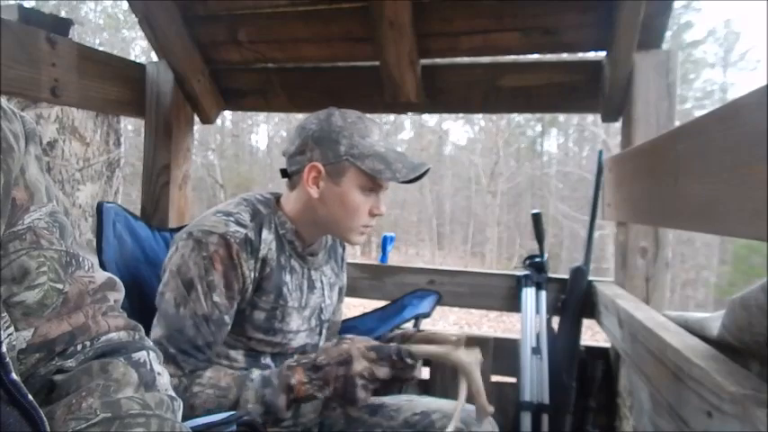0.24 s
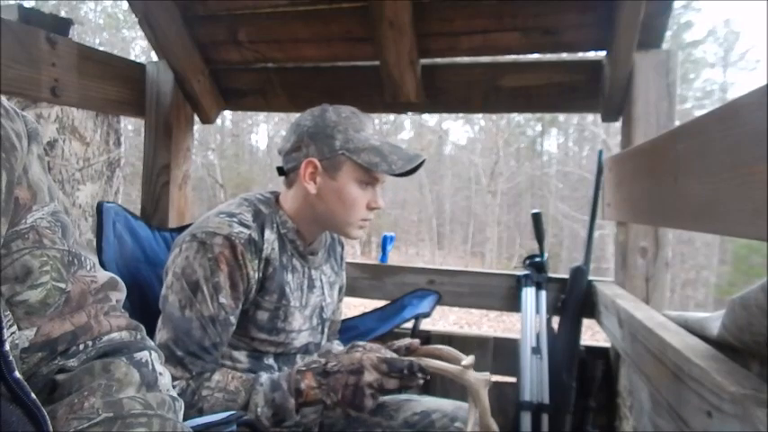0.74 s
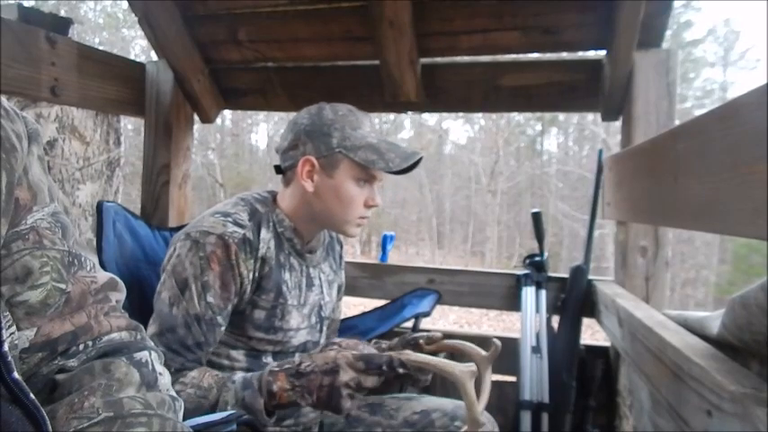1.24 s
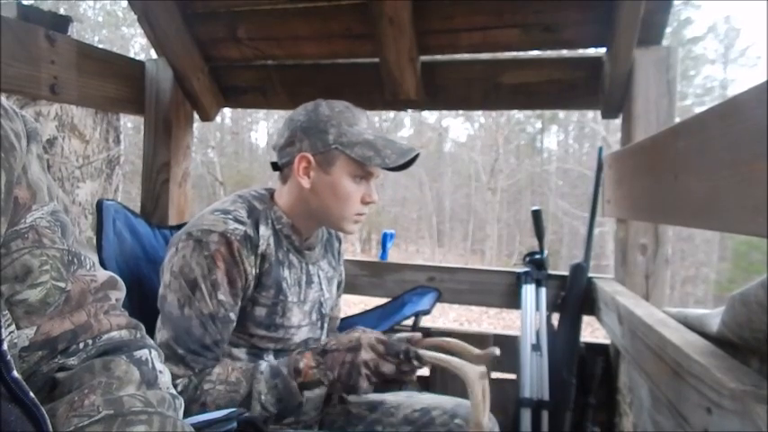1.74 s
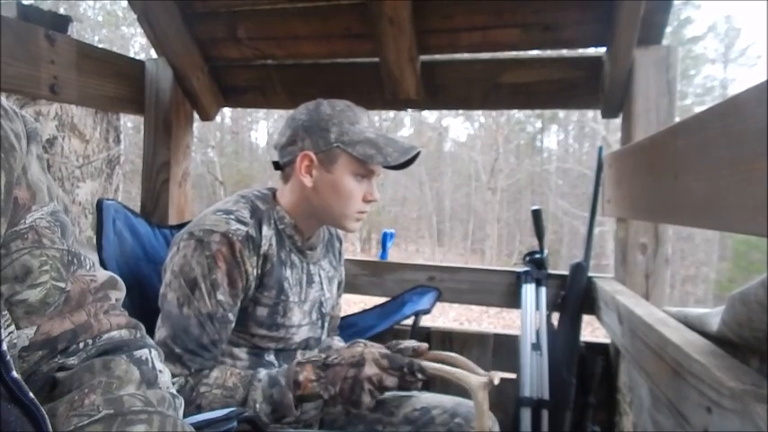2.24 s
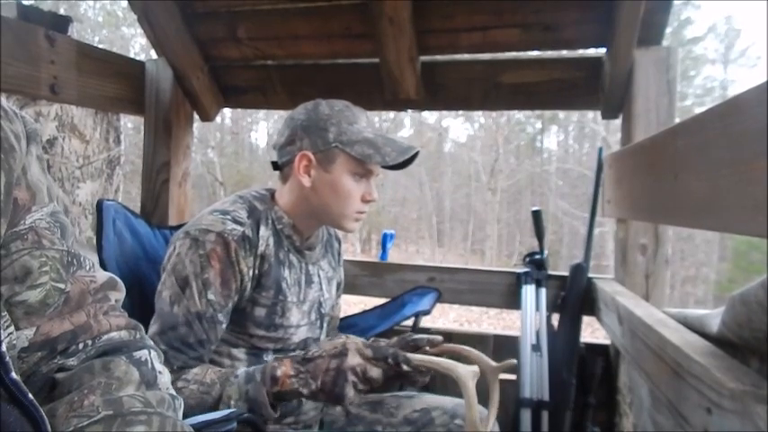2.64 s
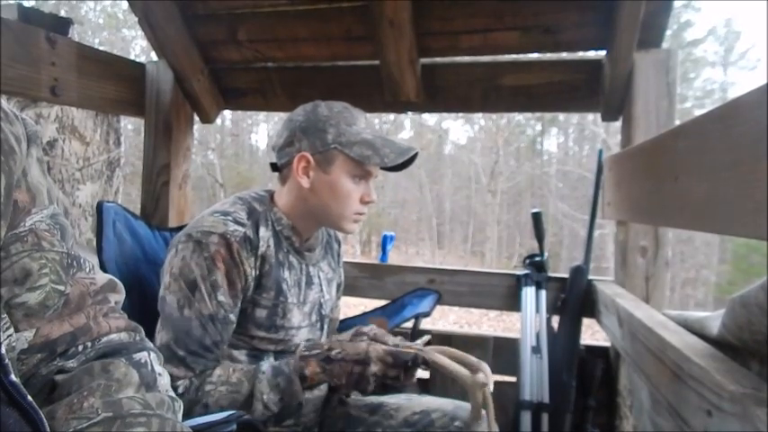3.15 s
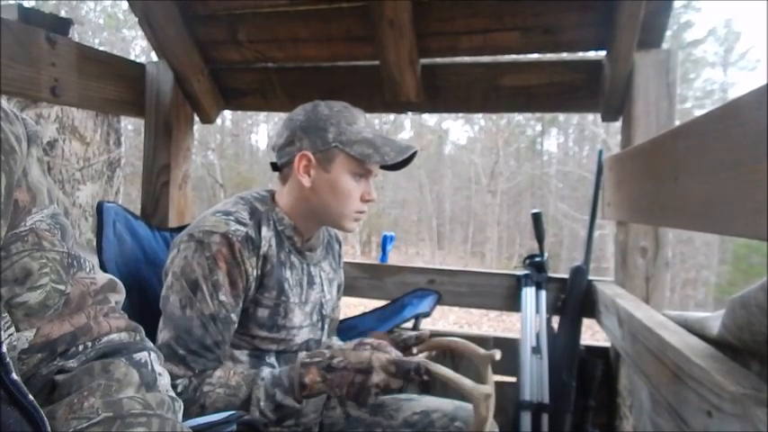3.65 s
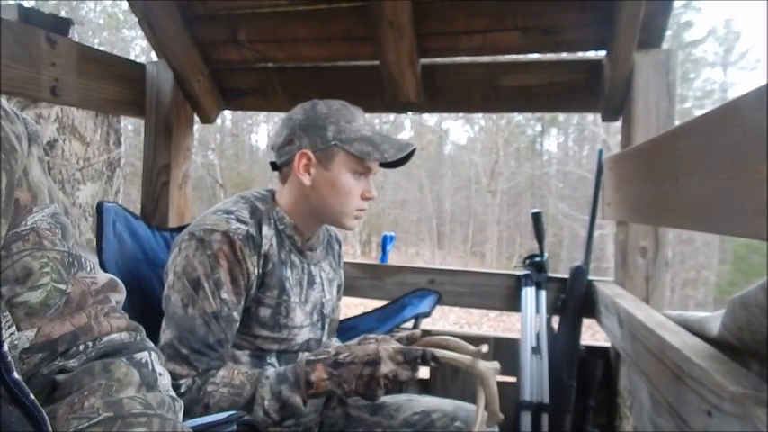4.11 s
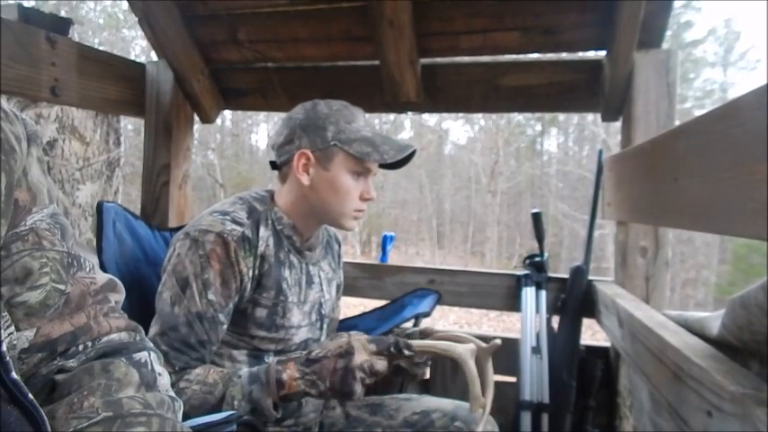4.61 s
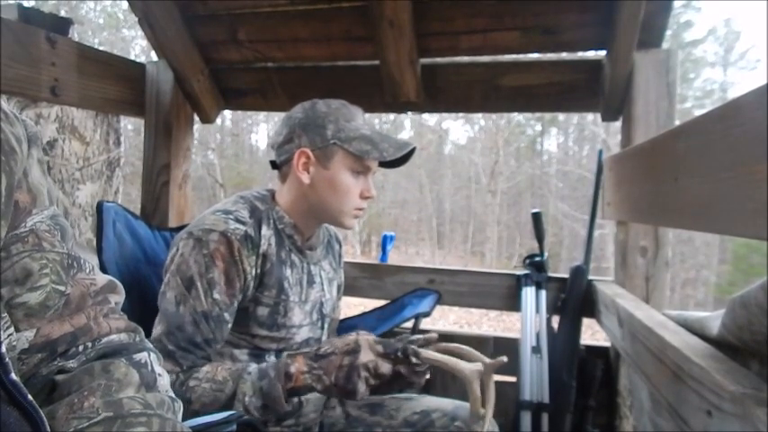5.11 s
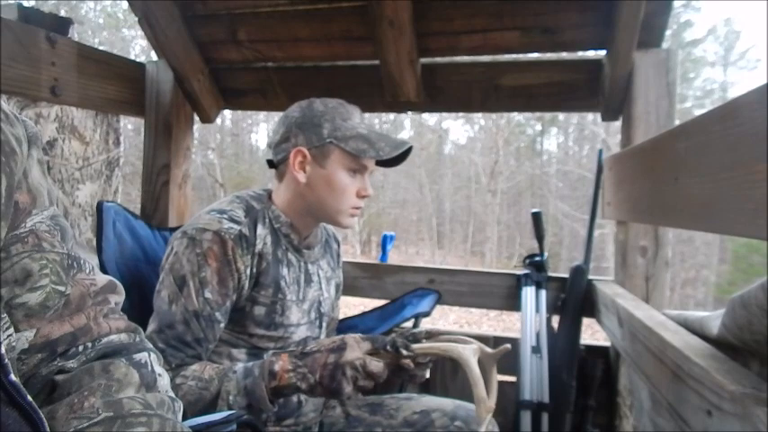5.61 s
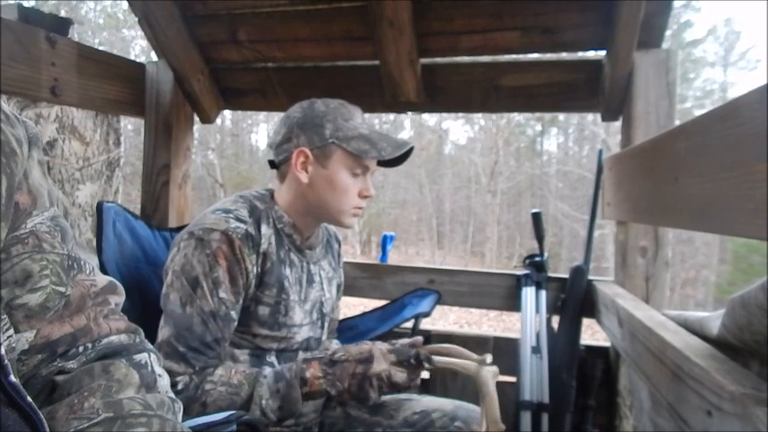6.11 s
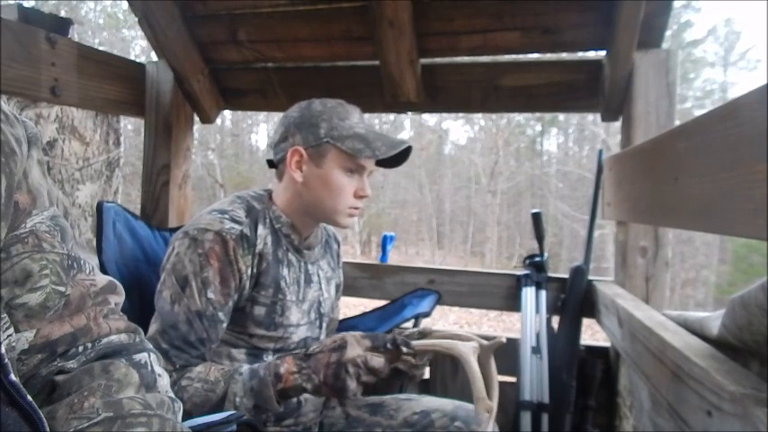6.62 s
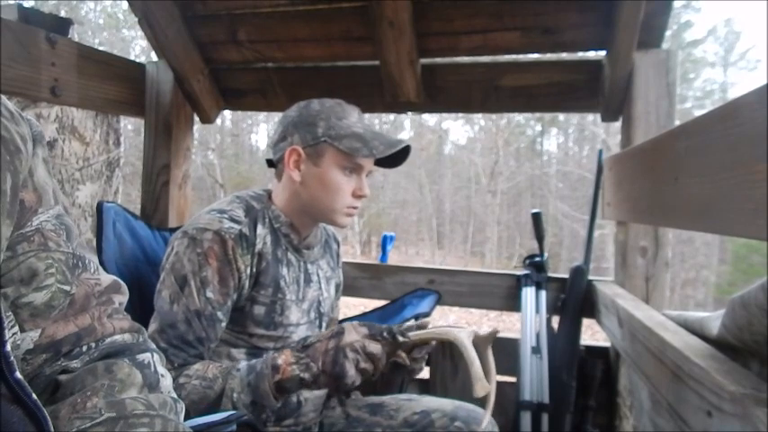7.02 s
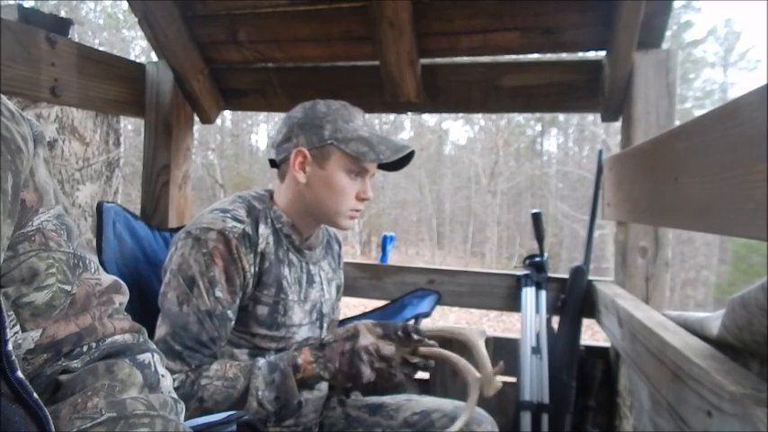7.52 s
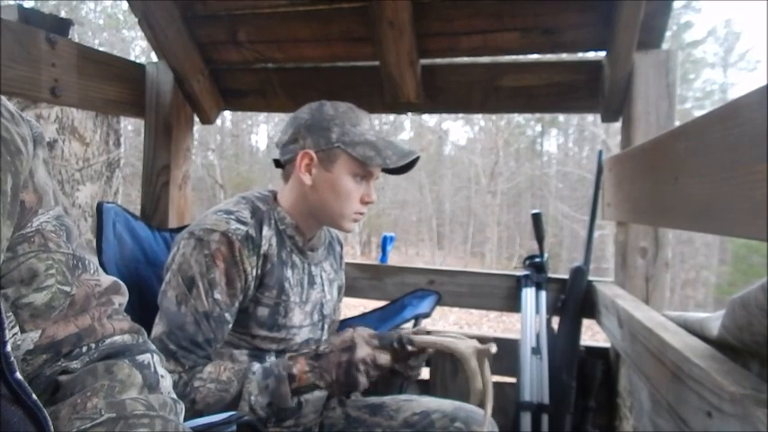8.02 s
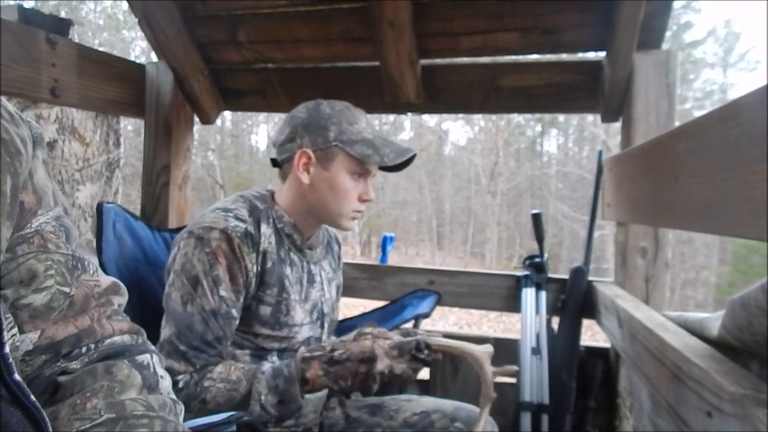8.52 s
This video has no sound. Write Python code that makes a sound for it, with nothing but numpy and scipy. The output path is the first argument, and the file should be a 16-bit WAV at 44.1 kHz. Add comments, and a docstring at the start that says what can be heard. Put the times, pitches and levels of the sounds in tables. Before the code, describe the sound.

Two hard antlers are knocked together close to the microphone inside a small open wooden stand. Separate dry double clacks come first, with small rebounds, faint scrapes and soft glove rustle between them. A denser clatter follows near the middle, then a strong pair of blows and a final loose run of rattling clicks. Boards give a short, tight reflection; quiet woods hush and low wind sit behind.

```python
"""A faint hush of the woods, then hard clacks: a hunter in a small roofed wooden stand knocks two antlers
together, first single blows, then a quick rattle. Each blow is a burst of tiny impacts that excites damped
modes of the tines, then bounces between the close boards and faintly off the trees.
Between blows, tines scrape by stick-slip and gloves brush as rough noise.
The gain ducks at each hard blow, holds and slowly recovers."""
import sys
import numpy as np
from scipy import signal
from scipy.fft import rfft, irfft, next_fast_len
from scipy.io import wavfile
from scipy.ndimage import uniform_filter1d, minimum_filter1d, map_coordinates

SR = 44100
rng = np.random.default_rng(int(sys.argv[2]) if len(sys.argv) > 2 else 0)


def to_wav(sig):
    """Store sig (one row per channel, or 1-D mono) as 16-bit WAV at the path in sys.argv[1].

    Samples outside -1..1 are clipped; the rate is SR.
    """
    pcm = np.clip(np.atleast_2d(sig), -1, 1) * 32767
    pcm = np.round(pcm).astype(np.int16)
    wavfile.write(sys.argv[1], SR, pcm.T)  # frames by channels


N = 385875
LIFE = SR // 5  # samples that one knock lasts

# Full blows: two tines landing one after the other, then a rebound.
# Each row: start in seconds, relative level in dB, knock and snap in dB (the bands 0.4-1.5 kHz and
# over 4.2 kHz against the middle), delay of the second tine in seconds, and the levels of
# the second tine and of the rebound in dB against the first.
FULL_BLOWS = [(0.378, -17, -7, -4, 0.0099, 0, -13.5), (1.829, -10.5, -13.5, -2, 0.017, -5, -28.5),
              (3.2264, -16, -9.5, -2, .005, -0.5, -13), (3.5183, -33, -5, 1.5, .0187, 4, -7),
              (3.7166, -20, -6.5, -1.5, 0.0065, -7, -10.5), (4.0194, -11, -11.5, -0.5, .006, -17, -12.5),
              (4.8436, -23, -13, -1.5, 0.013, -2.5, -17), (6.0041, -13, -15, -9.5, 0.0092, -9, -15),
              (6.085, -13, -14.5, -2.5, 0.0098, -4, -32), (7.2275, -18, -16, -1, 0.015, -4, -7.5),
              (7.572, -23, -14, 0.5, 0.014, -8, -21), (7.9595, -37.5, -11, -2, 0.015, 3, -10),
              (8.0841, -32.5, -5, -7, .007, 3.5, -6.5), (8.1603, -24, -15, -2.5, 0.0076, -14, -11.5),
              (8.2745, -25.5, -7.5, -2.5, .018, -16, -24), (8.5622, -23.5, -12, -0.5, 0.0051, -14, -15)]


def amp(db):
    """Decibels are logarithmic: 20 dB is a tenfold amplitude."""
    return 10 ** (np.asarray(db) / 20)


def unit(x):
    """Normalise the mean power: x at rms 1."""
    return x / np.sqrt(np.mean(x ** 2) + 1e-20)


def one_joule(x):
    """Normalise the energy: each channel's squares sum to 1."""
    return x / np.sqrt(np.sum(x ** 2, axis=-1, keepdims=True) + 1e-20)


def along(points, hz):
    """Pitch is logarithmic: read (Hz, value) points on a log axis."""
    f, v = np.transpose(points)
    return np.interp(np.log(hz + 1), np.log(f + 1), v)


def wobble(rate):
    """Slow modulation: a smooth random curve through rate knots a second."""
    knots = rng.standard_normal(int(N * rate / SR) + 4)
    return map_coordinates(knots, [np.arange(N) * rate / SR])


def coloured(x, gain_db):
    """Minimum-phase filtering: folding the cepstrum makes the response gain_db(Hz) causal."""
    n = x.shape[-1]
    m = 2 * next_fast_len(n // 2 + 2048)
    log_gain = np.log(amp(gain_db(np.fft.rfftfreq(m, 1 / SR))) + 1e-6)
    cepstrum = irfft(log_gain, m)
    cepstrum[..., 1:m // 2] *= 2
    cepstrum[..., m // 2 + 1:] = 0
    response = np.exp(rfft(cepstrum))
    return irfft(rfft(x, m) * response, m)[..., :n]


def add(track, s, sound):
    """Superposition: mix a sound into the track at s seconds."""
    part = track[:, round(s * SR):][:, :sound.shape[-1]]
    part += sound[..., :part.shape[-1]]


def strokes(rows):
    """Amplitude envelope: a half-sine swell for each (start s, end s, dB) row."""
    t = np.arange(N) / SR
    return sum(amp(db) * np.sin(np.pi * np.clip((t - start) / (end - start), 0, 1))
               for start, end, db in rows)


def air(spectrum):
    """Frequency-dependent coherence: mid and side noise are weighted by how alike left and right are."""
    # Each row: frequency in Hz, left-right correlation from -1 to 1.
    likeness = [(60, 0.57), (180, 0.89), (550, 0.86), (1650, 0.52), (4970, -0.15), (15000, 0.92)]

    def gain_db(hz):
        alike = np.clip(along(likeness, hz), -.99, .99)
        return along(spectrum, hz) + 10 * np.log10([1 + alike, 1 - alike])

    mid, side = coloured(rng.standard_normal((2, N)), gain_db)
    return unit(np.array([mid + side, mid - side]))


def woods(hush_db=-62.0, hiss_db=-76, rumble_db=-68, waver_db=0.78, gust_db=2, lumps_db=5.5, draught_db=-3):
    """Broadband ambience: noise bands with a drifting bass, and low turbulence mostly on the right."""
    # Colours of the hush, treble hiss and rumble. Each row: frequency in Hz, relative density in dB per Hz.
    hush_colour, hiss_colour, rumble_colour = [(30, -23), (80, -4), (150, -8.5), (220, -2), (300, -5.5),
                                               (600, -8), (850, -10), (1250, -10), (2500, -22.5),
                                               (4500, -24.5), (12000, -52.5)], [(200, -4.5), (1500, 1), (3500, 2),
                                                             (5500, -3.5), (9000, -1.5), (13000, -7),
                                                             (16000, -19)], [(20, -22), (45, -0.5),
                                                                           (72, -0.5), (120, -3.5),
                                                                           (220, -8), (500, -29.5),
                                                                           (1500, -70)]
    # Drift of the low sound. Each row: time in seconds, relative level in dB.
    bass_drift = [(0, 0.5), (0.902, 0.5), (1.602, -5.5), (2.199, -2.5), (3.1, 2.5), (4, 0), (4.6, -3),
                  (5.3, -8), (5.9, 1.5), (7.1, 4), (8.75, 0.5)]
    # Draughts. Each row: start in seconds, end in seconds, relative level in dB.
    draughts = [(.02, .42, -53), (.64, 1.12, -49.5), (2.55, 3.3, -57.5), (3.48, 4.04, -54)]
    bass_hz, hush_follows = 403, 0.19  # upper edge of the bass; share of its dB drift in the rest of the hush

    drift_db = np.interp(np.arange(N) / SR, *np.transpose(bass_drift))
    hush = amp(hush_db + waver_db * wobble(18)) * air(hush_colour)
    bass = signal.sosfiltfilt(signal.butter(2, bass_hz, fs=SR, output="sos"), hush)
    hiss = amp(hiss_db) * air(hiss_colour)
    rumble = amp(rumble_db + gust_db * np.array([wobble(10), wobble(13)])) * air(rumble_colour)
    gusts = signal.sosfilt(signal.butter(2, 130, fs=SR, output="sos"), air(rumble_colour))
    flutter = amp(draught_db) * strokes(draughts) * unit(amp(lumps_db * wobble(36)) * gusts)
    flutter = flutter * amp([[-14], [0]])  # left, right
    upper_hush = amp(hush_follows * drift_db) * (hush - bass)
    return upper_hush + amp(drift_db) * (bass + rumble) + hiss + flutter


def trees(x):
    """Diffuse scattering: the far trunks' answer swells late and dies exponentially."""
    echo_db, t60_s, rise_s = -41, 0.8, .05
    t = np.arange(SR) / SR
    decay = (1 - np.exp(-t / rise_s)) * amp(-60 * t / t60_s)
    tail = rng.standard_normal((2, SR)) * decay
    return amp(echo_db) * signal.fftconvolve(x, one_joule(tail), axes=1)[:, :N]


def gloves(rough_db=3, snags_per_s=25, snag_db=-7):
    """Cloth friction: roughly modulated noise gives a grainy swish, sparse impulses tick as fibres snag."""
    # Gloves brushing the antlers. Each row: start in seconds, end in seconds, relative level in dB.
    brushes = [(1.25, 1.44, -83), (1.44, 1.53, -68.5), (1.67, 1.85, -63), (3.46, 3.56, -56),
               (4.25, 4.52, -69), (5.48, 5.7, -67.5)]
    cloth = [(300, -28.5), (1500, -7.0), (4000, 0.5), (6500, -3.5),
             (9500, 2), (13000, -9.5), (16000, -11)]  # (Hz, dB)
    swish = unit(rng.standard_normal((2, N)) * amp(rough_db * wobble(360)))
    snags = unit((rng.random(N) < snags_per_s / SR) * rng.standard_normal((2, N)))
    rustle = coloured(swish + amp(snag_db) * snags, lambda hz: along(cloth, hz))
    return strokes(brushes) * unit(rustle)


def tines(scatter_db, detune):
    """Modal synthesis: damped sines, with strength and pitch scattered by the point of contact and the grip."""
    # Modes of the antlers. Each row: frequency in Hz, relative level in dB.
    modes = [(600, -10.5), (680, -15.5), (895, -6), (1290, -1.5), (1370, -4.5), (1950, -3), (2100, -3.5),
             (2420, -3.5), (2685, 3), (2930, -12.5), (3380, 1.5), (3750, -5), (4300, -1.5), (4500, 1.5),
             (5150, -3.5), (5890, -3.5), (6370, 2.5), (7870, -5), (8840, -2)]
    t = np.arange(LIFE) / SR
    hz, db = np.transpose(modes)[:, :, None]
    # hand-held bone is well damped, its high modes most; seconds to fall by 60 dB
    t60 = .048 * (hz / 2700) ** -.4
    size, shift, phase = rng.standard_normal((3, len(modes), 1))
    waves = np.sin(2 * np.pi * (hz * (1 + detune * shift) * t + phase))
    decaying = amp(db + scatter_db * size - 60 * t / t60) * waves
    return one_joule(np.sum(decaying, axis=0))


def boards(near_db, near_s, tail_db):
    """Room impulse response: the straight path, early reflections off near boards and a short diffuse tail."""
    # Decay of the stand. Each row: frequency in Hz, time to fall by 60 dB in seconds.
    decay = [(300, .13), (1000, .075), (3000, .06), (10000, .055)]
    side_colour = [(200, -16.0), (600, -12.5), (1300, -8.5), (2500, 0.5)]  # (Hz, dB)
    t = np.arange(LIFE) / SR
    hz, frame_s, z = signal.stft(rng.standard_normal((2, LIFE)), SR, nperseg=128)
    faded = z * amp(-60 * frame_s / along(decay, hz)[:, None])
    tail = signal.istft(faded, SR, nperseg=128)[1][:, :LIFE]
    near = rng.standard_normal((2, LIFE)) * np.exp(-((t - .002) / near_s) ** 2)
    mid, other = amp(near_db) * one_joule(near) + amp(tail_db) * one_joule(tail)
    # long waves reach both sides alike
    side = coloured(other, lambda f: along(side_colour, f))
    paths = np.array([mid + side, mid - side]) / np.sqrt(2)
    paths[:, 0] += 1  # the straight path
    return paths


def slides():
    """Sliding contact as (start, end, level): the drawn strokes and the skid after each full blow."""
    # Tines drawn along each other. Each row: start in seconds, end in seconds, relative level in dB.
    drawn = [(0.858, 1.04, -67.5), (1.19, 1.45, -63), (2.142, 2.32, -63), (3.404, 3.535, -53),
             (3.509, 3.574, -41), (3.599, 3.678, -50), (3.825, 3.883, -41), (4.441, 4.622, -57),
             (4.74, 4.838, -47.5), (4.8, 4.975, -39), (6.02, 6.09, -30.5), (6.183, 6.274, -40.5),
             (7.424, 7.482, -44.5), (7.602, 7.78, -48), (7.853, 7.93, -52), (7.964, 8.051, -48),
             (8.07, 8.18, -53.5), (8.282, 8.44, -43.5), (8.565, 8.67, -36.5)]
    skid_s, skid_db = .055, -18  # length; level against the blow's
    return list(drawn) + [(s, s + skid_s, db + skid_db) for s, db, *_ in FULL_BLOWS]


def scrapes(ring_db=-10, rough_db=4.0):
    """Stick-slip friction: ridges catch and slip in tiny random blows, each slide ringing a new spot."""
    slips_per_s = 2500
    rasp = [(100, -35.5), (600, -11.5), (1300, 3.5), (1650, -1), (2100, 4.0), (2900, -2),
            (4500, -5.5), (6500, -10.5), (9000, -13.5), (15000, -28.0)]  # (Hz, dB)
    out = np.zeros((2, N))
    for start, end, db in slides():
        n = round((end - start) * SR)
        chance, size = rng.random(SR // 2), rng.standard_normal(SR // 2)
        slips = ((chance < slips_per_s / SR) * size)[:n]
        slips = slips * np.sin(np.linspace(0, np.pi, len(slips)))
        body = amp(ring_db) * tines(scatter_db=3.5, detune=0.015)
        body[0] += 1  # the dry slip itself
        room = boards(near_db=2.0, near_s=0.0064, tail_db=-1.5)
        paths = signal.fftconvolve(body[None], room, axes=1)
        rub = coloured(signal.fftconvolve(slips[None], paths, axes=1), lambda hz: along(rasp, hz))
        add(out, start, amp(db) * np.sqrt(n / 2) * one_joule(rub))
    return out * unit(amp(rough_db * wobble(70)))


def knock_and_snap(x):
    """Spectral balance: levels in dB of the low and the high band against the middle band."""
    power = np.sum(np.abs(rfft(x)) ** 2, axis=0)
    edges = np.searchsorted(np.fft.rfftfreq(x.shape[-1], 1 / SR), [400, 1500, 4200])
    low, middle, high = 10 * np.log10(np.add.reduceat(power, edges) + 1e-20)
    return low - middle, high - middle


def contacts():
    """Repeated impact as (start, level, knock, snap): a full blow is two tines and a rebound."""
    # Single clicks of one tine. Each row: start in seconds, relative level in dB, knock in dB, snap in dB.
    clicks = [(0.3654, -41, -1, 0), (0.4399, -32.5, -8, -5), (0.4858, -36, -7, -8.5),
              (0.5462, -45, 0.5, -10), (0.5728, -37.5, -4.5, -13.5), (2.327, -48.5, 2, -13),
              (3.3144, -39.5, -5, -12.5), (3.855, -38, -18, -5), (4.146, -54, 6, -13),
              (4.7471, -36.5, -0.5, -8), (4.816, -24.5, -7, 5), (4.9035, -26.5, -14.5, -11.5),
              (4.9585, -19, -13, 6), (5.159, -52, -11.5, -1), (5.2278, -46.5, -9, 2.5),
              (5.2597, -46.5, -11, -8), (5.483, -62, 1.5, -4), (5.7037, -55.5, 7, -13),
              (5.9899, -27.5, -15.5, -2.5), (7.3191, -37, -9, -8), (7.3505, -29, -8, 0),
              (7.4993, -26, -8, 0.5), (7.6767, -40.5, -22, 2.5), (7.7132, -27, -14.5, -7.5),
              (7.837, -33, -4.5, -9), (7.8625, -33, -14, -11), (7.9992, -39, -12, 10),
              (8.0594, -28.5, -4, -11), (8.153, -40, -5, 3), (8.2551, -35, -8, -11),
              (8.3338, -36, -11.5, 1.5), (8.3691, -38.5, -15, -9), (8.443, -33.5, -8.5, -9.5),
              (8.4689, -21.5, -15, -8.5), (8.6454, -41, -34, 21), (8.6952, -34, -6.5, -17.5)]
    second_snap_db = 1.5  # the second tine lands nearer its tip and snaps brighter
    rebound_s = .032  # the antlers spring apart and meet again
    touches = list(clicks)
    for s, db, knock_db, snap_db, delay_s, second_db, rebound_db in FULL_BLOWS:
        touches += [(s, db, knock_db, snap_db),
                    (s + delay_s, db + second_db, knock_db, snap_db + second_snap_db),
                    (s + rebound_s, db + rebound_db, knock_db, snap_db)]
    return touches


def clacks(tine_db=4, near_s=.005):
    """Impact excitation: a brief force excites the modes; thick beams knock, thin tips snap."""
    # Colour of a knock. Each row: frequency in Hz, relative density in dB per Hz.
    knock_colour = [(60, -23.5), (250, -18), (620, -8), (780, -11.5), (1000, -6), (1330, -2.5), (1650, -6),
                    (2100, -0.5), (2700, -2), (3450, -1.5), (4050, -4), (6300, -6), (9500, -14.5),
                    (14500, -31), (15700, -45)]
    # the snappier the contact, the thinner and higher the tine
    middle_tine_hz, snap_db_per_octave = 3400, 22
    bite_s, bite_spread = .0012, .3  # time a contact takes to build, and its log scatter
    out = np.zeros((2, N))
    t = np.arange(LIFE) / SR
    for s, db, knock_db, snap_db in contacts():
        tine_hz = middle_tine_hz * 2 ** (snap_db / snap_db_per_octave)
        build_s = bite_s * np.exp(bite_spread * rng.standard_normal())
        # the ridged tines skid in a flurry of tiny blows as they bite
        u = t / build_s
        force = one_joule(rng.standard_normal(LIFE) ** 3 * u * np.exp(-u * u))
        force[round(build_s * SR / 2)] += 2  # the main blow
        body = amp(-6) * tines(scatter_db=3.5, detune=.022)
        body[0] += 1  # the dry crack
        blow = signal.fftconvolve(force, body)[:LIFE]
        paths = boards(near_db=9, near_s=near_s, tail_db=5)
        heard = signal.fftconvolve(blow[None], paths, axes=1)[:, :LIFE]

        def colour_db(hz):
            # the struck tine favours the modes near its own pitch
            octaves = np.log2((hz + 1) / tine_hz)
            return along(knock_colour, hz) + tine_db * np.exp(-(octaves / .16) ** 2)

        heard = coloured(heard, colour_db)
        # where the tines meet sets the share of dull knock and bright snap
        low, high = np.subtract((knock_db, snap_db), knock_and_snap(heard))
        tilt = [(60, -8), (150, -2), (300, low / 2), (600, low), (1350, low),
                (1900, 0), (3700, 0), (4800, high)]  # (Hz, dB)
        heard = coloured(heard, lambda hz: along(tilt, hz))
        # the level counts the energy as spread over 14 ms
        add(out, s, amp(db) * np.sqrt(0.014 * SR) * one_joule(heard))
    return out


def gain_control(x):
    """Dynamic range compression: a loud blow cuts the gain at once; it holds, then creeps back."""
    limit_db, hold_s, recover_db_per_s = -21.5, 0.15, 12.5
    size = round(.006 * SR)
    power = np.abs(uniform_filter1d(np.mean(x ** 2, axis=0), size))
    level_db = 10 * np.log10(power + 1e-12)
    hold = round(hold_s * SR)
    needed_db = minimum_filter1d(np.minimum(limit_db - level_db, 0), hold, origin=(hold - 1) // 2)
    climb_db = recover_db_per_s * np.arange(N) / SR
    gain_db = np.minimum.accumulate(needed_db - climb_db) + climb_db
    return x * amp(uniform_filter1d(gain_db, size // 2))


def scene():
    """Interaural differences: level and delay between left and right place the antlers amid the woods."""
    # Each row: frequency in Hz, left minus right level in dB.
    balance = [(700, -0.5), (1300, -1.5), (2600, 2.5), (3400, -3.5), (4400, -3.5), (6800, -4.5),
               (8600, 0.5), (12000, 0)]
    lag = 1  # samples by which the left side lags
    halves = np.array([[.5], [-.5]])
    left, right = coloured(clacks() + scrapes(), lambda hz: along(balance, hz) * halves)
    antlers = np.array([np.roll(left, lag), right])
    return antlers + trees(antlers) + gloves() + woods()


def record(dry, notch_width_hz=45):
    """Compression, soft saturation and band limiting, with narrow notches at multiples of 2.5 kHz."""
    top_hz = 15500
    dry = gain_control(dry)
    dry = dry / (1 + (dry / .33) ** 4) ** (1 / 4)  # rounds the highest peaks
    for hz in (2500, 5000, 7500, 10000):
        dry = signal.lfilter(*signal.iirnotch(hz, hz / notch_width_hz, SR), dry)
    return signal.sosfilt(signal.ellip(10, .1, 80, top_hz, fs=SR, output="sos"), dry)


dry = scene()
out = record(dry)
to_wav(out)
```